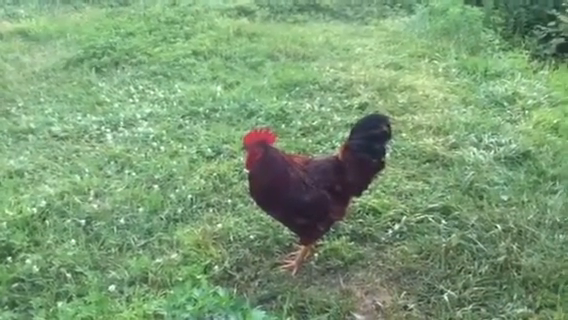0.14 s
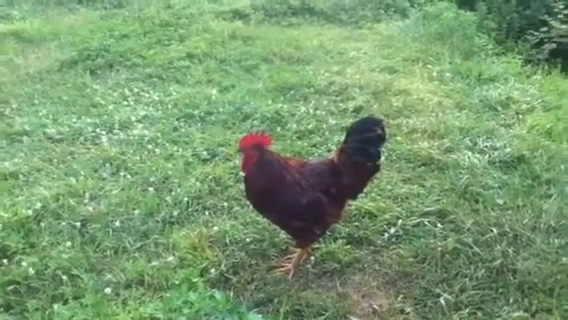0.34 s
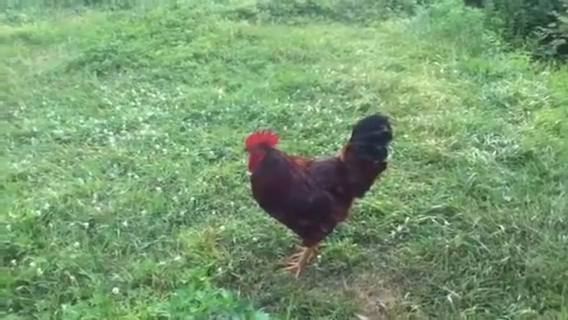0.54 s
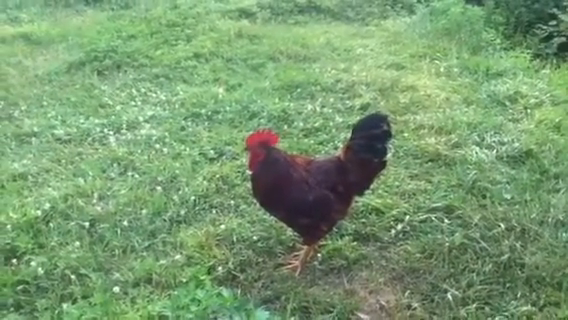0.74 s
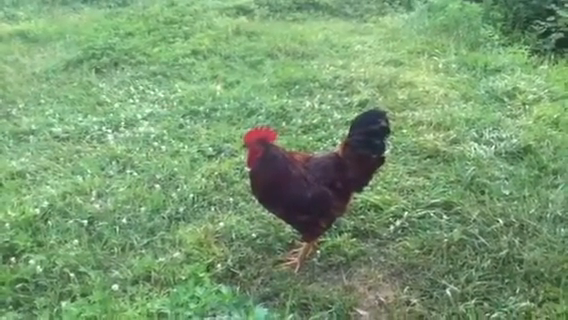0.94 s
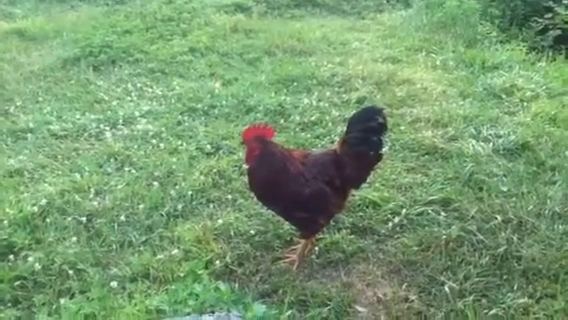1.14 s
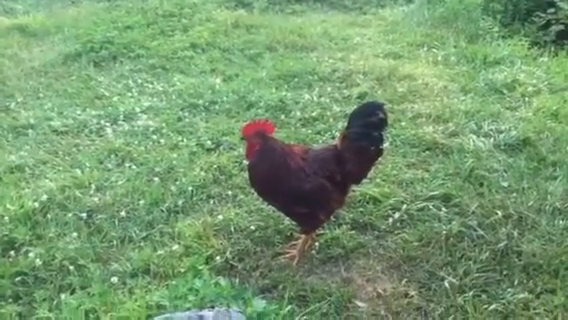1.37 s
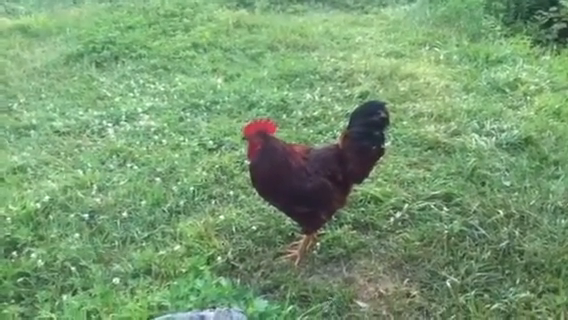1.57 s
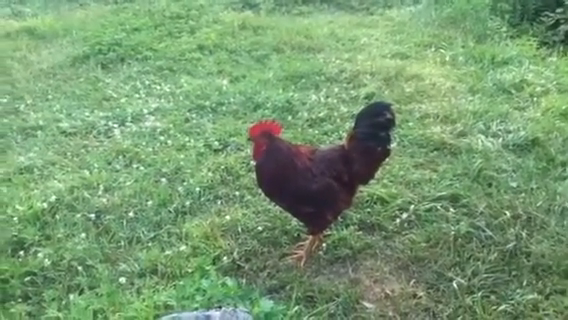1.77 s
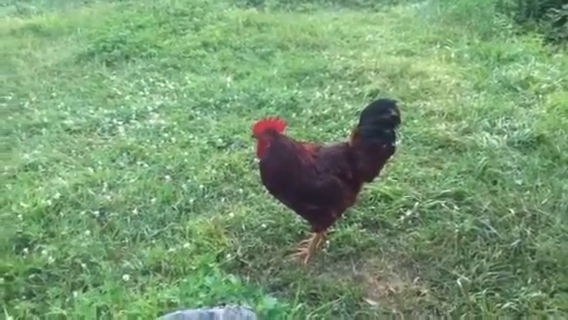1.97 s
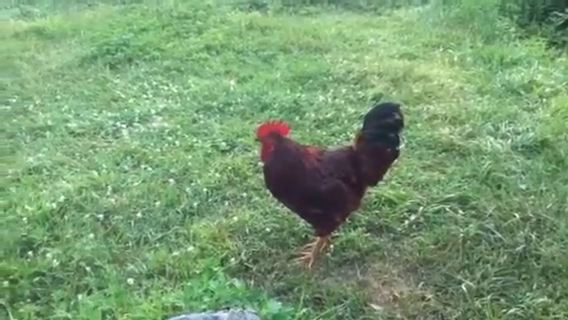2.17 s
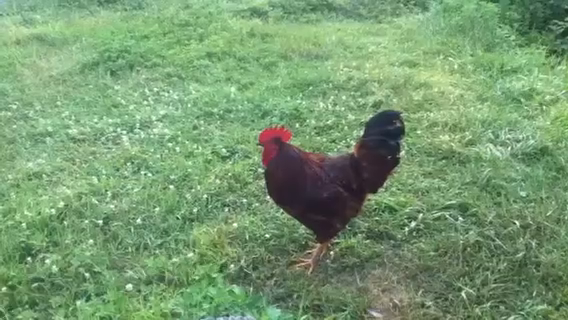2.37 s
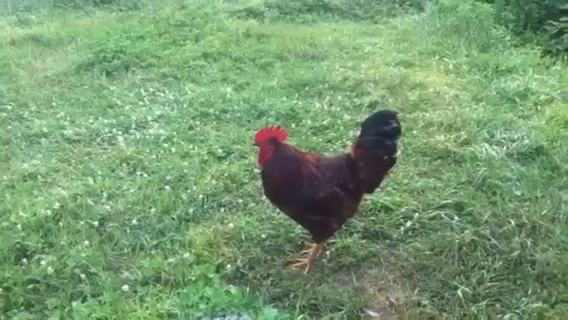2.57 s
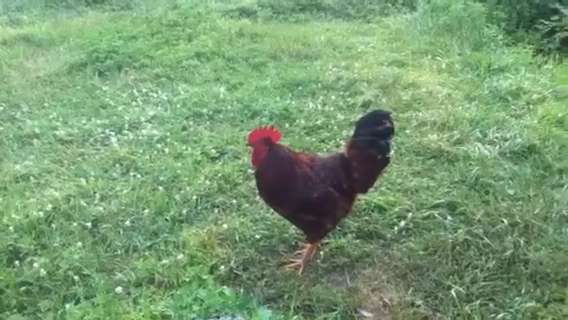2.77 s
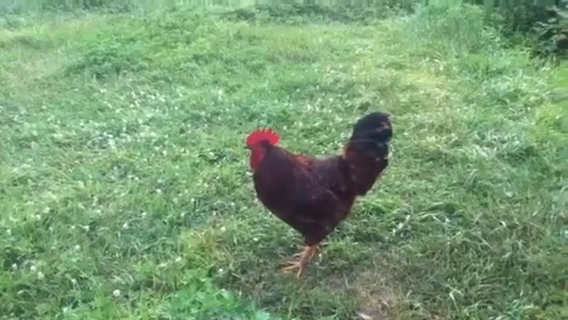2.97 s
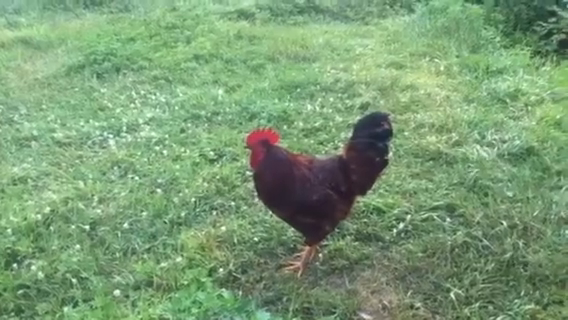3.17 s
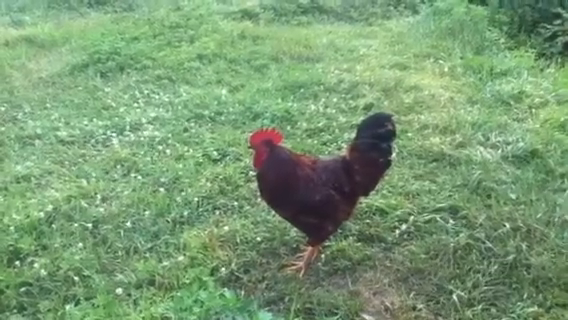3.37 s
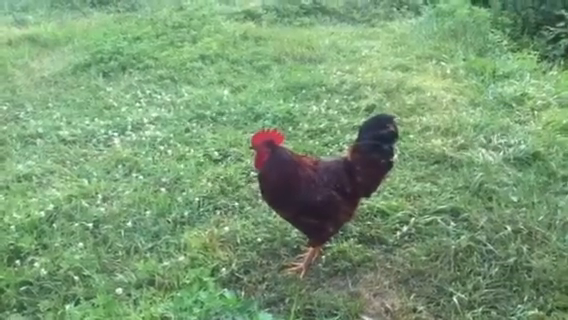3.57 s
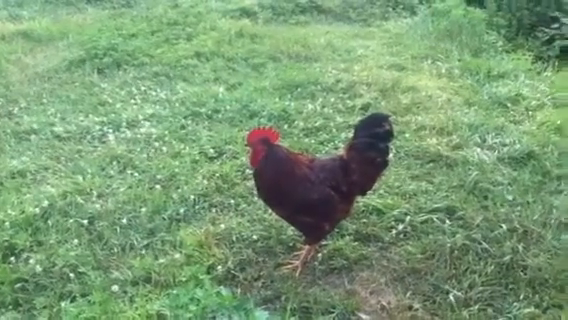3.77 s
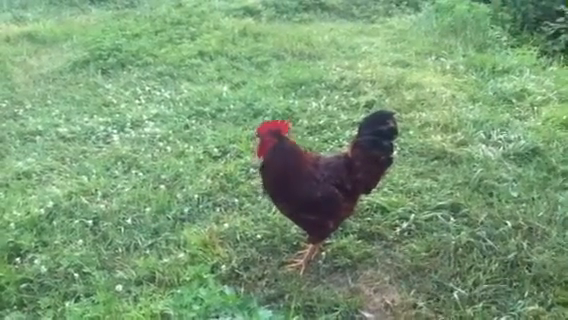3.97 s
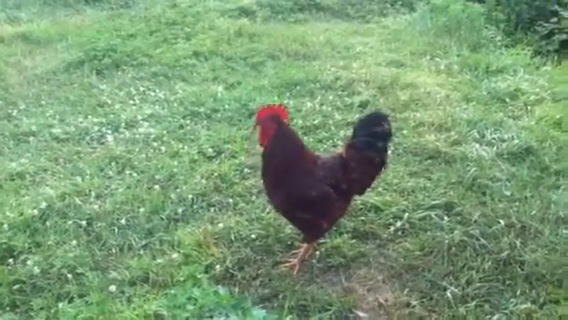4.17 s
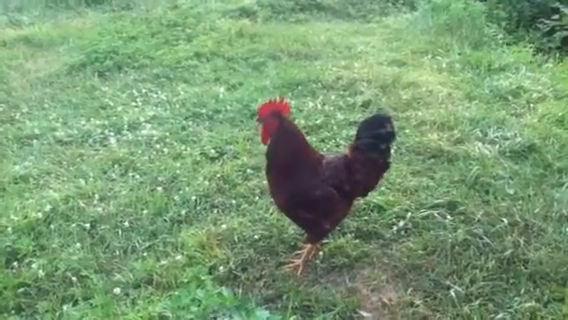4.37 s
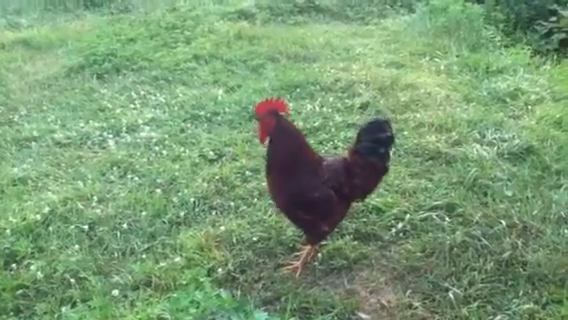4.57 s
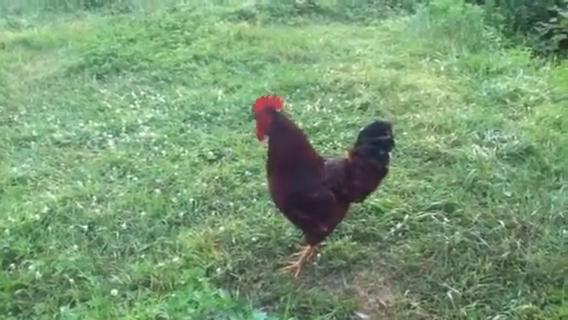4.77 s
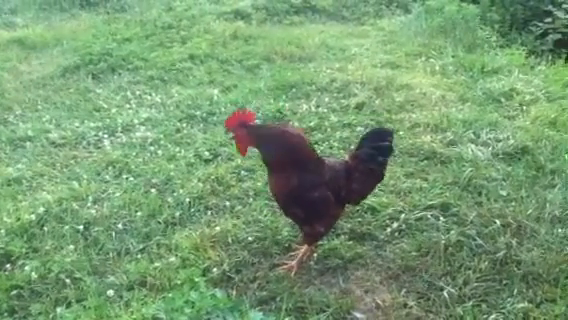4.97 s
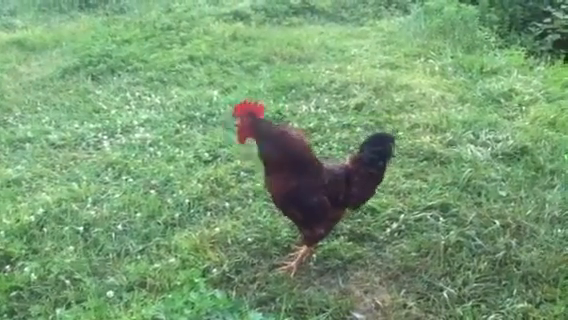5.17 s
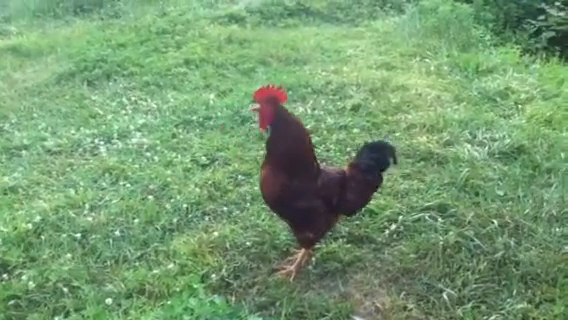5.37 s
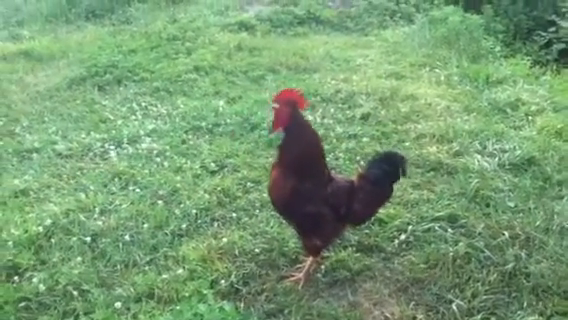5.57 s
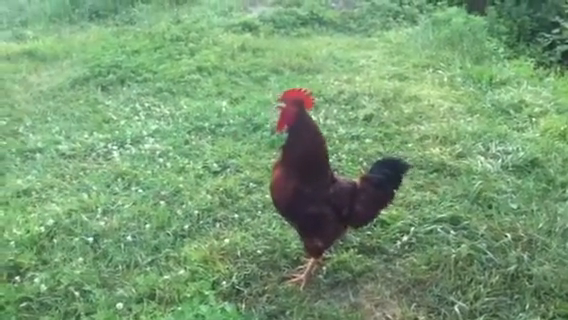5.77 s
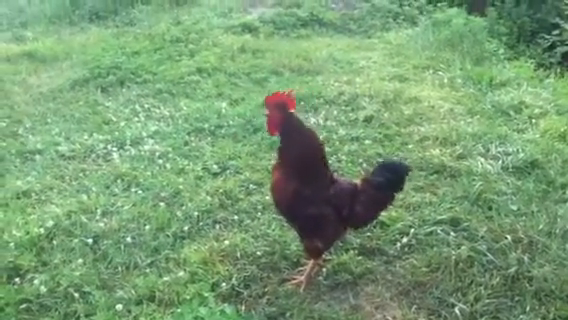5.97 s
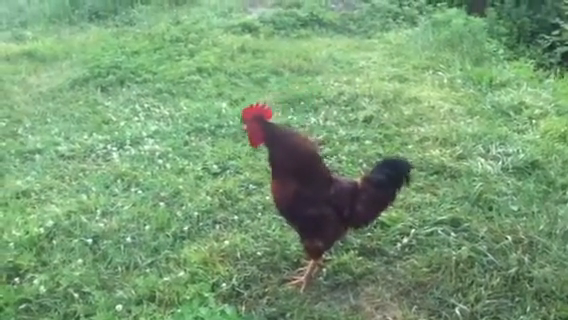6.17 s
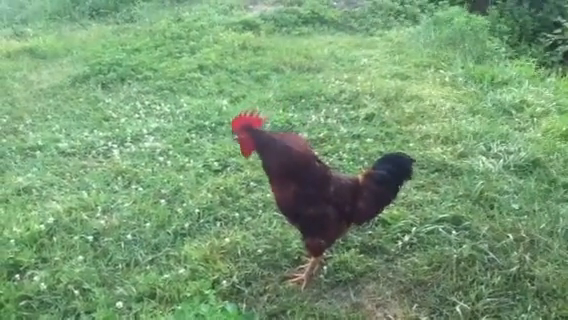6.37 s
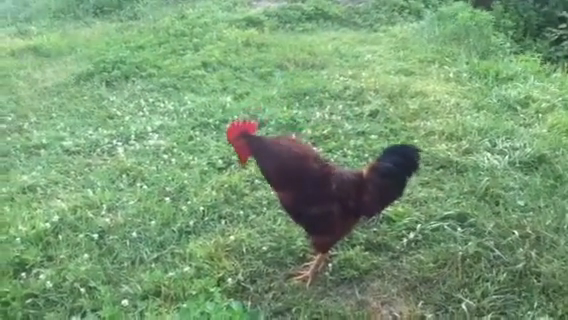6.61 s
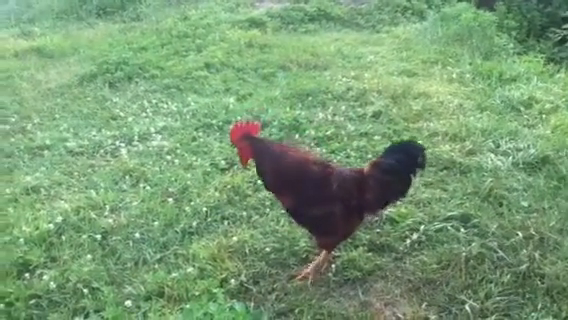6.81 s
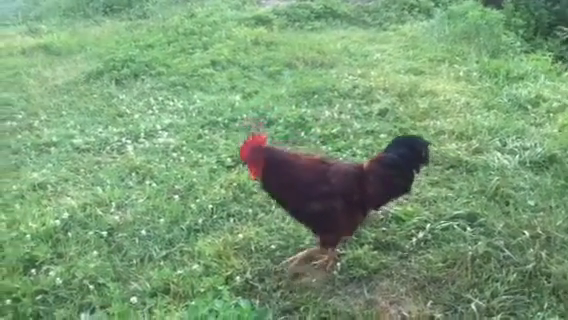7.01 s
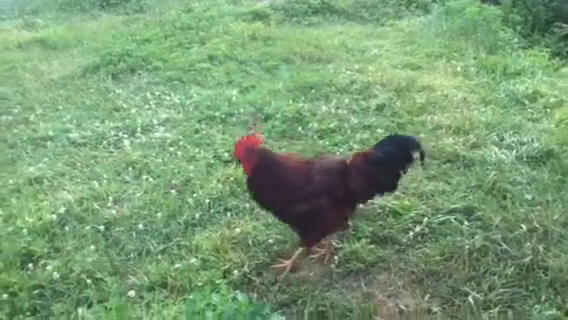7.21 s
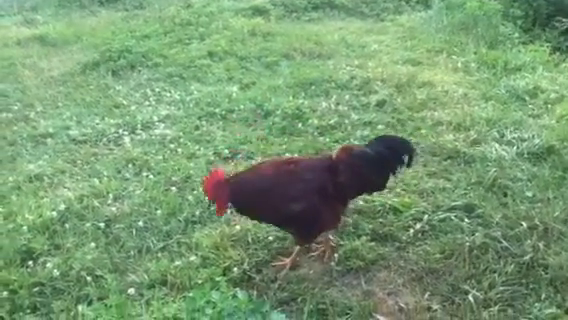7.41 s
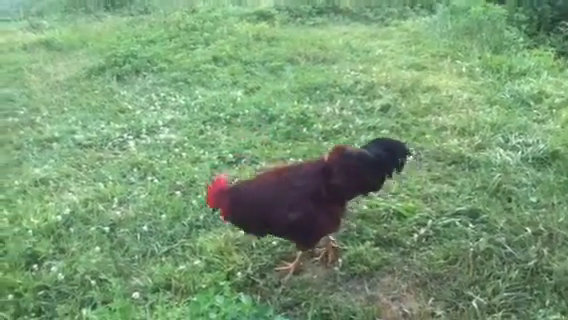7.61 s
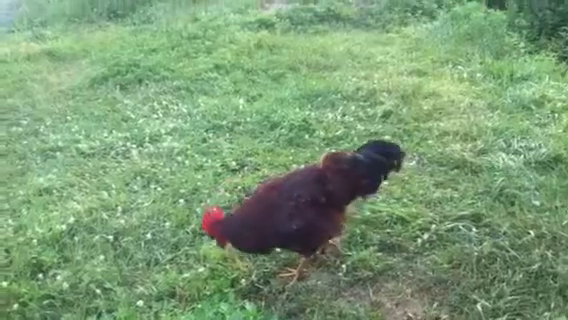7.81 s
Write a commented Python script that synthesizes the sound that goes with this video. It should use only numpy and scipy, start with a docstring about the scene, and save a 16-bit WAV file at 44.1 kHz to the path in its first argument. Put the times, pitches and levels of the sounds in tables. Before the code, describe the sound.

From 0 to 5 s there is a soft outdoor bed: low restless rumble, faint wavering hum, light steady hiss and a few gentle rushes. In the first second a small far bird gives thin, steep falling chips and a couple of rising slurs. Around 1.5 to 2.2 s another pipes very faintly and evenly on one pitch. From 2.4 to 5.1 s a clearer warbler runs through quick scoops, arches, buzzy trills and flicks, echoing softly in trees. At 5.16 s a close rooster crows, suddenly far louder and nearly dry: a short rising-falling bark, a second, higher one at 5.4, a third from 5.7 that stutters rapidly, then from 6.0 a long held note, cracked at first, bright and nasal, sagging before it stops abruptly near 6.7. A faint echo fades; quiet rumble and hiss continue to about 7.9 s, with a soft rush at the end.

```python
"""Rooster crowing among small birds

Small birds whistle in the trees over a soft outdoor rumble, a low wavering hum and a few soft rushes of noise.
Then a near rooster crows once: two short syllables, a stuttering third and a long held note.
His voice box (syrinx) makes pulses that ring through throat and beak, turning hoarse or splitting
into strong and weak pulses on the way. The birds are gliding near-sine tones with an echo from the trees.
"""
import sys
import numpy as np
from scipy import signal
from scipy.fft import rfft, irfft
from scipy.io import wavfile
from scipy.ndimage import uniform_filter1d

SR = 44100
rng = np.random.default_rng(int(sys.argv[2]) if len(sys.argv) > 2 else 0)


def materialize(psi):
    """Save the field psi as 16-bit PCM at rate SR to the path in sys.argv[1].

    A 1-D psi becomes a single channel; in a 2-D psi each row is a channel.
    """
    bounded = np.clip(np.atleast_2d(psi).T, -1, 1)
    quanta = np.round(bounded * 32767).astype(np.int16)
    wavfile.write(sys.argv[1], SR, quanta)


N = 346185
TIME = np.arange(N) / SR
FREQS = np.fft.rfftfreq(N, 1 / SR) + 0.00086  # Hz, nudged off zero so that it can be divided by

# --- tables of the surroundings ---
# colour of the outdoor noise: (f/Hz, level/dB per Hz, relative)
AIR_COLOUR = [(15, -47), (25, -18.5), (96, -1), (119, -2), (198, -3), (240, -9.5), (322, -8), (368, -17.5),
              (703, -17), (1020, -18), (2120, -19.5), (3260, -28), (3830, -27.5), (5430, -30.5),
              (15500, -35.5)]
# level of the background, pressed down by the recorder's gain control while the rooster crows,
# written out as a curve: (t/s, rumble and hum gain/dB, upper air gain/dB)
BACKGROUND_LEVEL = [(0, 0, 1.5), (1.0, 1.5, 2.5), (2.3, 0, 2), (3.4, 3, 2), (4.4, 0.5, 2.5), (5.3, 3.5, 2),
                    (5.55, -8, 2.5), (6.7, -3, 1.5), (7.1, -0.5, 0.5), (7.85, -2, 1)]
# low hum before this level curve: (f/Hz, level/dB)
HUM_TONES = [(64, -66), (94.5, -58.5), (186, -63.5), (209, -61.5)]
# soft rushes of noise: (t/s, half length/s, f/Hz, width/Hz, level/dB)
SOFT_RUSHES = [(.5, 0.38, 1420, 250, -59), (1.1, .04, 2880, 700, -59.5), (1.25, .12, 490, 40, -65),
               (5.037, 0.047, 370, 130, -54.5), (7.763, 0.16, 1330, 300, -56.5),
               (7.76, 0.074, 5500, 2500, -72)]

# --- tables of the birds ---
# first bird, steep falling chips: (t/s, level/dB)
CHIP_NOTES = [(.053, -57), (.28, -53.5), (.485, -53.5), (.908, -56), (.943, -59)]
# its rising slurs: (t/s, level/dB)
SLUR_NOTES = [(.697, -52.5), (.842, -56.5)]
# warbling bird, scoops that fall to a lowest pitch and turn up: (t/s, length/s, lowest f/Hz, level/dB)
SCOOP_NOTES = [(2.617, .1, 3230, -53), (2.775, 0.12, 2520, -55.5), (3.233, 0.13, 3350, -44),
               (3.544, .12, 2884, -48.5), (3.755, .1, 4860, -50.5), (3.885, .085, 4900, -60),
               (4.229, .085, 2656, -49), (4.6, 0.084, 4300, -47), (4.904, 0.14, 3177, -45)]
# its arched notes: (t/s, length/s, top f/Hz, level/dB, trill depth/Hz)
ARCH_NOTES = [(3.408, 0.091, 4290, -51.5, 120), (3.453, 0.066, 3920, -45.5, 80),
              (4.021, 0.043, 3320, -45, 170), (4.138, 0.04, 2824, -48, 190),
              (4.736, 0.077, 3840, -45.5, -0.5)]
# its rising notes, most of them buzzing: (t/s, length/s, middle f/Hz, level/dB, trill depth/Hz)
BUZZ_NOTES = [(2.433, 0.073, 6400, -57.5, 450), (2.396, .12, 2900, -57.5, 250),
              (2.509, 0.048, 4900, -57, 750), (2.944, 0.088, 2780, -51.5, 198),
              (3.097, 0.091, 4420, -51, 280), (4.523, 0.067, 4410, -49, 250), (4.799, 0.031, 3710, -44, 0),
              (5.065, .03, 4650, -56.5, 100)]
# its quick downward flicks: (t/s, length/s, start f/Hz, level/dB)
FLICK_NOTES = [(3.644, .025, 7000, -58), (3.641, .03, 3600, -51), (4.417, .03, 4020, -51)]
# nearly level whistles: (t/s, length/s, start f/Hz, level/dB)
WHISTLE_NOTES = [(3.907, 0.1, 2910, -47.5), (4.366, .062, 4070, -44), (3.917, .14, 4160, -59),
                 (6.847, .51, 7650, -75)]

# --- tables of the rooster ---
# pitch of the syrinx, one curve a syllable: (t/s, f/Hz)
CROW_PITCH = [
    [(5.158, 419.7), (5.172, 445), (5.183, 443), (5.192, 488.4), (5.22, 510.4), (5.232, 553.4), (5.30, 542),
     (5.328, 499.6), (5.375, 482.5)],
    [(5.392, 482), (5.405, 587), (5.436, 622), (5.449, 697), (5.497, 659.5), (5.516, 554), (5.555, 562),
     (5.612, 492.5), (5.65, 474.5)],
    [(5.68, 469), (5.698, 558), (5.716, 605), (5.93, 603.3), (5.97, 580)],
    [(5.995, 565.5), (6.025, 567.7), (6.11, 557.8), (6.33, 555.7), (6.42, 551.8), (6.5, 543), (6.6, 527.1),
     (6.668, 509.4), (6.69, 425)],
]
# loudness, one curve a syllable: (t/s, voice level/dB, treble level/dB)
CROW_LOUDNESS = [
    [(5.16, -18.5, -39), (5.18, -12.5, -26.5), (5.208, -20.5, -26.5), (5.234, -10, -26),
     (5.264, -12.5, -32), (5.316, -11.5, -19.5), (5.34, -14, -28.5), (5.362, -24.5, -55), (5.372, -34, -57)],
    [(5.38, -25, -52), (5.39, -12, -34), (5.418, -11, -29.5), (5.442, -11.5, -44), (5.454, -14, -28),
     (5.496, -13, -38), (5.53, -20.5, -48.5), (5.618, -18.5, -40), (5.648, -32, -66)],
    [(5.655, -30, -62), (5.677, -18, -42.5), (5.705, -20.5, -41.5), (5.717, -12, -41),
     (5.969, -14.5, -41.5), (5.975, -18, -42)],
    [(5.985, -18, -46), (6.025, -14.5, -40), (6.229, -16.5, -39.5), (6.455, -13, -26), (6.547, -15, -35),
     (6.621, -15.5, -24.5), (6.669, -17, -32.5), (6.679, -23, -32.5), (6.705, -48.5, -73)],
]
# manner of each syllable: (hoarse start/s, hoarse end/s, roughness between/0-1,
# fundamental/dB, its growth/dB per s, upper throat/dB, sizzle/dB)
SYLLABLE_MANNER = [(0.013, 0.0405, .115, 3, -40, -8, -27.5), (.024, 0.0436, .115, -2, -15, -5.5, -27.5),
                   (.036, .004, 0.07, 0.5, 2.5, 2.5, -28.5), (0.0047, 0.024, 0.02, -1.5, 14.5, -7, -26.5)]
# the voice turns shrill or splits into strong and weak pulses:
# (start t/s, end t/s, alternation/0-1, added roughness/0-1, upper throat gain/dB)
VOICE_BREAKS = [(5.168, 5.2, 0.03, 0.03, 5.5), (5.38, 5.408, 0.48, .05, 2), (5.497, 5.515, 0.1, 0.1, 1),
                (5.975, 6.091, 0.35, .025, 8.5), (6.096, 6.16, 0.85, .3, 1),
                (6.635, 6.671, 0.01, 0.03, 3.5)]
# throat and beak resonances in the first syllable: (f/Hz, width/Hz, level/dB)
FIRST_THROAT = [(618, 66, 24.5), (1040, 330, 4), (1395, 180, 1), (1674, 250, -4.5), (2477, 150, -5),
                (3800, 190, -19), (4814, 200, -5), (5570, 450, -18.5), (6720, 780, -21), (7500, 230, -21),
                (10180, 1100, -24), (11440, 700, -32), (12500, 500, -46)]
# throat and beak resonances in the middle syllables: (f/Hz, width/Hz, level/dB)
MIDDLE_THROAT = [(660, 150, 14.5), (1042, 750, 1.5), (1580, 150, -19.5), (1668, 150, -1), (2810, 77, -8.5),
                 (3870, 380, -23.5), (4780, 120, -10), (5600, 680, -12), (6850, 550, -14),
                 (8150, 560, -21.5), (8670, 1100, -36), (11400, 600, -23.5), (12600, 470, -24)]
# throat and beak with the neck stretched for the held note: (f/Hz, width/Hz, level/dB)
HELD_THROAT = [(591, 200, 3.5), (1078, 460, 6), (1675, 110, 3), (2462, 95, -3.5), (3740, 142, -9.5),
               (4820, 228, 1), (5410, 370, -8.5), (6415, 210, -9), (7430, 246, -14.5), (9580, 350, -28),
               (10870, 830, -27.5), (12640, 940, -35)]
# side cavities that swallow the sound: (f/Hz, width/Hz)
SIDE_CAVITIES = [(3120, 220), (3250, 420), (4200, 98), (8450, 220)]
# borders of fundamental, low throat, upper throat, beak and sizzle: (f/Hz)
REGISTER_BORDERS = [400, 780, 1450, 3200, 8700, 15500]

# --- settings of the birds ---
CHIP_S, CHIP_HZ, CHIP_END_HZ = .06, 7450, 4300
# each chip has a short low foot; the delay counts from the chip's start, the level is relative to it
FOOT_DELAY_S, FOOT_S, FOOT_HZ, FOOT_DB = .064, .026, 4240, -3
SLUR_S, SLUR_HZ, SLUR_END_HZ = .056, 4020, 6330
# a far bird pipes evenly on one pitch
PIPE_START_S, PIPE_PERIOD_S, PIPE_S, PIPE_HZ, PIPE_DB = 1.485, .134, .068, 3890, -64.5
SCOOP_FALL_S, SCOOP_DEPTH = .072, .25  # time to the lowest pitch; start above it, as a share
ARCH_DROP = .13  # both ends lie this share under the top
BUZZ_RISE = .18  # rise over the note, as a share of its middle pitch
FLICK_FALL = .24  # share of the pitch that a flick loses
# faint twitter between the notes
TWITTER_SPAN_S, TWITTER_RANGE_HZ = (2.4, 5.1), (2700, 5440)
TWITTER_S, TWITTER_DB, TWITTER_TRILL_HZ = .07, -63, 300

# --- settings of the rooster ---
HOARSE = .5  # roughness added at the ends of a syllable
ALTERNATION = .0075  # unevenness of the ordinary pulses
HOARSE_BRIGHT_DB = 8  # lift of the upper throat per unit of roughness
BREAK_EDGE_S = .012  # a break sets in and clears quickly
# the fundamental gains on the overtones as the pitch climbs into the lowest throat resonance
TUNED_HZ, TUNING_RANGE_HZ, TUNING_DB = 543.7, 60, 8.5
SIZZLE_KNEE_DB, SIZZLE_FALL = -19.5, 1.4  # under this voice level the sizzle falls extra, in dB per dB
# the third syllable stutters: evenly spaced catches, each a little shallower
STUTTER_START_S, STUTTER_PERIOD_S, CATCH_HALF_S, CATCH_FADE = 5.758, .0258, .0058, .96


def to_gain(db):
    """Turn decibels into a multiplier of the wave."""
    return 10 ** (np.asarray(db) / 20)


def curves(rows):
    """Join each column of a table by straight lines in time."""
    times, *columns = np.transpose(rows)
    return [np.interp(TIME, times, column) for column in columns]


def filtered(x, response):
    """Change the strength of each frequency in a sound."""
    return irfft(rfft(x) * response, N)


def noise(response):
    """Coloured noise, scaled to a spread (rms) of 1."""
    x = filtered(rng.standard_normal(N), response)
    return x / np.std(x)


def wander(rate_hz):
    """Smooth random drift of spread 1, mostly slower than the given rate."""
    return noise(1 / (1 + (FREQS / rate_hz) ** 4))


def resonance(hz, width_hz):
    """Response of one damped resonance, with gain 1 at its centre."""
    return 1 / (1 + 1j * (FREQS ** 2 - hz ** 2) / (FREQS * width_hz))


def band(low_hz, high_hz, order=24):
    """Response that passes only the frequencies between two borders."""
    return 1 / np.sqrt((1 + (low_hz / FREQS) ** order) * (1 + (FREQS / high_hz) ** order))


def scatter(x, t60_s, delay_s):
    """Blurred echo from trees and bank: dying noise that falls by 60 dB in t60_s."""
    t = TIME[:2 * SR]
    tail = rng.standard_normal(len(t)) * np.exp(-np.log(1000) * t / t60_s) * (t > delay_s)
    return signal.fftconvolve(x, tail / np.linalg.norm(tail))[:N]


def hum(waver=.02573):
    """Low sine tones that waver in pitch and level."""
    out = np.zeros(N)
    for f, level in HUM_TONES:
        gain = to_gain(level + 2 * wander(5.4))
        hz = f * (1 + waver * wander(12.3))
        out += gain * np.sin(2 * np.pi * np.cumsum(hz) / SR)
    return out


def rushes():
    """Bands of noise that swell and fade smoothly."""
    out = np.zeros(N)
    for start, half, f, width, level in SOFT_RUSHES:
        swell = np.exp(-((TIME - start) / half) ** 2)
        out += to_gain(level) * swell * noise(abs(resonance(f, width)) ** 2)
    return out


def outdoors(air_db=-51, rumble_top_hz=350, rumble_db=-3.5, rumble_flicker_db=1.5, air_flicker_db=.26):
    """Noise split into a restless rumble and smooth upper air, joined by hum and rushes."""
    hz, db = np.transpose(AIR_COLOUR)
    colour = to_gain(np.interp(np.log(FREQS), np.log(hz), db))
    air = noise(colour) * to_gain(air_db)
    rumble = filtered(air, 1 / (1 + (FREQS / rumble_top_hz) ** 4))
    upper = air - rumble
    low_db, high_db = curves(BACKGROUND_LEVEL)
    low = rumble * to_gain(rumble_db + rumble_flicker_db * wander(9.3)) + hum()
    high = upper * to_gain(high_db + air_flicker_db * wander(6))
    return low * to_gain(low_db) + high + rushes()


def bird_notes(pipes=6):
    """List notes as (t/s, length/s, start f/Hz, middle f/Hz, end f/Hz, level/dB, trill depth/Hz)."""
    notes = []
    for s, db in CHIP_NOTES:
        notes.append((s, CHIP_S, CHIP_HZ, (CHIP_HZ + CHIP_END_HZ) / 2, CHIP_END_HZ, db, 60))
        notes.append((s + FOOT_DELAY_S, FOOT_S, FOOT_HZ, FOOT_HZ, FOOT_HZ * 1.05, db + FOOT_DB, 0))
    for s, db in SLUR_NOTES:
        notes.append((s, SLUR_S, SLUR_HZ, SLUR_HZ * 1.17, SLUR_END_HZ, db, 0))
    for k in range(pipes):
        notes.append((PIPE_START_S + k * PIPE_PERIOD_S, PIPE_S, PIPE_HZ, PIPE_HZ, PIPE_HZ, PIPE_DB, 0))
    for s, length, hz, db in SCOOP_NOTES:
        moments = np.array([0, length / 2, length])
        start, middle, end = hz * (1 + SCOOP_DEPTH * (1 - moments / SCOOP_FALL_S) ** 2)
        notes.append((s, length, start, middle, end, db, 40))
    for s, length, hz, db, trill in ARCH_NOTES:
        foot = hz * (1 - ARCH_DROP)
        notes.append((s, length, foot, hz, foot, db, trill))
    for s, length, hz, db, trill in BUZZ_NOTES:
        notes.append((s, length, hz * (1 - BUZZ_RISE / 2), hz, hz * (1 + BUZZ_RISE / 2), db, trill))
    for s, length, hz, db in FLICK_NOTES:
        notes.append((s, length, hz, hz * (1 - FLICK_FALL / 2), hz * (1 - FLICK_FALL), db, 0))
    for s, length, hz, db in WHISTLE_NOTES:
        notes.append((s, length, hz, hz, hz * .985, db, 25))
    return notes


def twitter(count=14):
    """List faint short glides at random times and pitches, in the same columns as bird_notes."""
    notes = []
    for when, height, glide in rng.random((count, 3)):
        start = np.interp(when, [0, 1], TWITTER_SPAN_S)
        hz = np.interp(height, [0, 1], TWITTER_RANGE_HZ)
        bend = .3 * (glide - .5)
        notes.append((start, TWITTER_S, hz * (1 - bend), hz, hz * (1 + bend), TWITTER_DB, TWITTER_TRILL_HZ))
    return notes


def songbirds(buzz_hz=105, warble_hz=34, waver_hz=35):
    """Near-sine whistles that arc through three pitches; trills are slow on low notes, a buzz on high ones."""
    out = np.zeros(N)
    waver = waver_hz * wander(200)
    for s, length, start, middle, end, db, trill in bird_notes() + twitter():
        span = slice(max(int(s * SR), 0), int((s + length) * SR))
        t = TIME[span] - TIME[span][0]
        progress = t / t[-1]
        arc = np.polyval(np.polyfit([0, .5, 1], [start, middle, end], 2), progress)
        rate = warble_hz if middle < 3150 else buzz_hz
        hz = arc + waver[span] + trill * np.sin(2 * np.pi * (rate * t + rng.random()))
        envelope = np.sqrt(2 * abs(np.sin(np.pi * progress)))
        out[span] += to_gain(db) * envelope * np.sin(2 * np.pi * np.cumsum(hz) / SR)
    return out


def manner():
    """Roughness and register balance: each syllable starts and ends hoarser than its middle."""
    rows = []
    for curve, settings in zip(CROW_LOUDNESS, SYLLABLE_MANNER):
        onset, ending, clear, fundamental_db, growth, upper_db, sizzle_db = settings
        start, end = curve[0][0], curve[-1][0]
        for s in np.linspace(start, end, 100):
            edges = np.exp(-((s - start) / onset) ** 4) + np.exp(-((end - s) / ending) ** 4)
            rows.append((s, clear + HOARSE * edges, fundamental_db + growth * (s - start), upper_db, sizzle_db))
    return curves(rows)


def breaks():
    """Alternation, added roughness and upper throat gain while the voice breaks."""
    gates = []
    for start, end, *_ in VOICE_BREAKS:
        opening = np.tanh((TIME - start) / BREAK_EDGE_S)
        closing = np.tanh((TIME - end) / BREAK_EDGE_S)
        gates.append((opening - closing) / 2)
    return np.transpose(VOICE_BREAKS)[2:] @ np.array(gates)


def registers(hz, fundamental_db, upper_db, sizzle_db):
    """Levels of the five registers in dB; fundamental, low and upper throat share the voice's loudness."""
    voice_db, treble_db = curves(np.vstack(CROW_LOUDNESS))
    tuning_db = TUNING_DB * np.tanh((hz - TUNED_HZ) / TUNING_RANGE_HZ)
    shares = np.array([fundamental_db + tuning_db, np.zeros(N), upper_db])
    total_db = 10 * np.log10(np.sum(to_gain(shares) ** 2, axis=0))
    sizzle_loss = SIZZLE_FALL * np.minimum(voice_db - SIZZLE_KNEE_DB, 0)
    return [*(voice_db + shares - total_db), treble_db, voice_db + sizzle_db + sizzle_loss]


def stutter(count=9):
    """Depth of the catches, each a brief dip in the voice; the third beat is skipped."""
    depth = np.zeros(N)
    for k in range(count):
        if k != 2:
            centre = STUTTER_START_S + k * STUTTER_PERIOD_S
            depth += CATCH_FADE ** k * np.exp(-((TIME - centre) / CATCH_HALF_S) ** 2)
    return depth


def syrinx(hz, rough, alternation, overtone_limit=36):
    """Uneven pulses, by turns strong and weak, with a puff of turbulence in each cycle."""
    jitter, flutter, shimmer = .055, .016, .61  # random shares of pitch, pitch and level
    rasp, hiss, hiss_hz = .2, 1.694, 7500  # full-range noise, treble noise and its lower border
    sway_db, sway_hz, sway_turns = 10, 45, .44  # swell of single overtones, its rate, slip in cycles
    drift_db, drift_hz = 2, 7
    strain = np.sqrt(rough)
    hz = hz * (1 + jitter * rough * wander(261) + flutter * strain * wander(75))
    phase = 2 * np.pi * np.cumsum(hz) / SR
    pulses = np.zeros(N)
    on = (TIME > CROW_PITCH[0][0][0] - .1) & (TIME < CROW_PITCH[-1][-1][0] + .1)
    since_start = TIME[on] - TIME[on][0]
    for k in range(1, overtone_limit):
        freedom = 1 - 1 / k  # the fundamental stays put, high overtones move most
        # even in the clear tone the overtones drift slowly in level
        drift = np.interp(since_start * drift_hz, np.arange(40), rng.standard_normal(40)) * freedom
        # strained membranes keep changing shape: each overtone swells and slips on its own
        swell, slip = (np.interp(since_start * sway_hz, np.arange(200), row) * strain[on] * freedom
                       for row in rng.standard_normal((2, 200)))
        gain = to_gain(sway_db * swell + drift_db * drift)
        tone = np.cos(k * phase[on] + 2 * np.pi * sway_turns * slip)
        pulses[on] += gain * tone * (k * hz[on] < SR / 2)
    # in hoarse moments the strong-weak pattern slips
    doubling = alternation * np.cos(phase / 2 + 4.1 * rough * wander(90))
    pulses *= (1 + doubling) * (1 + shimmer * rough * wander(220))
    # the air jet hisses mostly in the treble
    jet = rasp * rough * rng.standard_normal(N) + hiss * strain * noise(band(hiss_hz, SR, order=6))
    return -pulses / np.sqrt(overtone_limit / 2) + jet * (1 + np.cos(phase))


def throat(x, modes, top_hz=12900):
    """Ring through steep-sided resonances, with notches where side cavities swallow sound."""
    peaks = sum(to_gain(db) * resonance(hz, width) * abs(resonance(hz, 2 * width)) for hz, width, db in modes)
    notches = np.prod([1 - resonance(hz, width) for hz, width in SIDE_CAVITIES], axis=0)
    return filtered(x, peaks * notches / np.sqrt(1 + (FREQS / top_hz) ** 36))


def rooster(catch_drop=.065, catch_rough=.18, ground_delay_s=.001518, ground_db=-10):
    """The crow: at each catch the pitch sags, the tone roughens and the fundamental weakens."""
    # one value for each of the five registers
    catch_db, trim_db = (-11, 3, -2, 0, 0), (.6, .2, -.1, 0, 0)
    hz, = curves(np.vstack(CROW_PITCH))
    rough, fundamental_db, upper_db, sizzle_db = manner()
    alternation, break_rough, break_db = breaks()
    bright_db = upper_db + break_db + HOARSE_BRIGHT_DB * rough
    levels = registers(hz, fundamental_db, bright_db, sizzle_db)
    catch = stutter()
    sagging_hz = hz * (1 - catch_drop * catch)
    roughness = np.clip(rough + break_rough + catch_rough * catch, 0, 1)
    source = syrinx(sagging_hz, roughness, np.clip(ALTERNATION + alternation, 0, 1))
    # the neck passes through three postures
    posture, = curves([(5.36, 0), (5.38, 1), (5.98, 1), (6.03, 2)])
    voice = np.zeros(N)
    for k, modes in enumerate((FIRST_THROAT, MIDDLE_THROAT, HELD_THROAT)):
        voice += np.clip(1 - abs(posture - k), 0, 1) * throat(source, modes)
    # the bounce off the turf makes gliding harmonics swell and fade
    bounce = to_gain(ground_db) * np.exp(-2j * np.pi * FREQS * ground_delay_s)
    voice = filtered(voice, 1 + bounce)
    # effort and beak opening share the power among five registers
    out = np.zeros(N)
    for low, high, db, dip, trim in zip(REGISTER_BORDERS, REGISTER_BORDERS[1:], levels, catch_db, trim_db):
        part = filtered(voice, band(low, high))
        power = uniform_filter1d(uniform_filter1d(part ** 2, size=500), size=500)
        evened = part / np.sqrt(abs(power) + 1e-12)
        out += evened * to_gain(db + trim + dip * catch)
    airflow = np.interp(TIME, [5.157, 5.16, 6.692, 6.712], [0, 1, 1, 0])
    return out * airflow


def scene(ring_hz=4750, ring_width_hz=200, ring_db=12):
    """The near rooster is almost dry; the far birds are wrapped in the echo of the trees."""
    background, birds, crow = outdoors(), songbirds(), rooster()
    birds = birds + to_gain(-4) * scatter(birds, t60_s=1.0, delay_s=.0048)
    # the faint echo of the crow is strongest around one shrill band
    shrill = to_gain(ring_db) * filtered(crow, resonance(ring_hz, ring_width_hz))
    crow = crow + to_gain(-37.5) * scatter(crow + shrill, t60_s=.58, delay_s=.023)
    return (background + birds + crow)[None]


def record(dry, ceiling=.61, whine_hz=14994, whine_db=-79, top_hz=15750):
    """The recorder rounds high peaks while sparing the bass, adds a thin whine and cuts the top."""
    overload = dry / (1 + (dry / ceiling) ** 8) ** (1 / 8) - dry
    rounded = dry + filtered(overload, band(400, SR, order=6))
    whine = np.sqrt(2) * to_gain(whine_db) * np.sin(2 * np.pi * whine_hz * TIME)
    top_cut = signal.ellip(10, .1, 80, top_hz, fs=SR, output="sos")
    return signal.sosfilt(top_cut, rounded + whine)


dry = scene()
out = record(dry)
materialize(out)
```